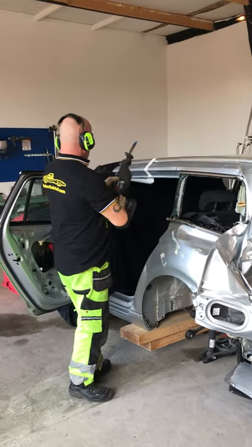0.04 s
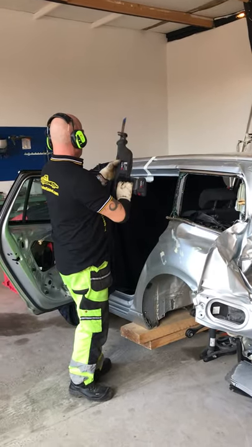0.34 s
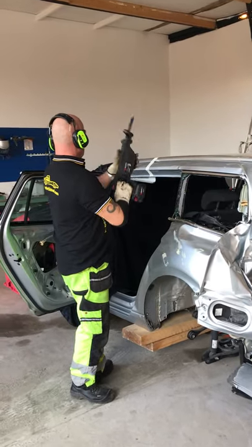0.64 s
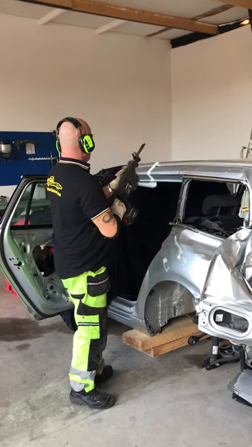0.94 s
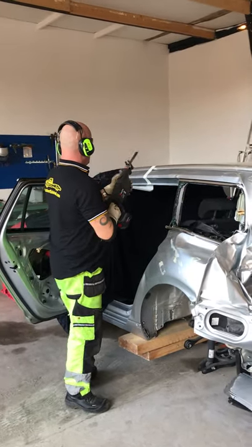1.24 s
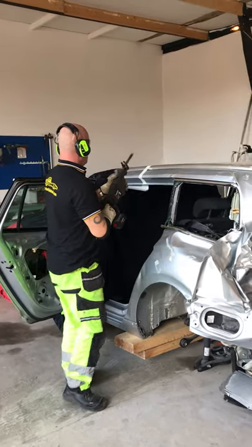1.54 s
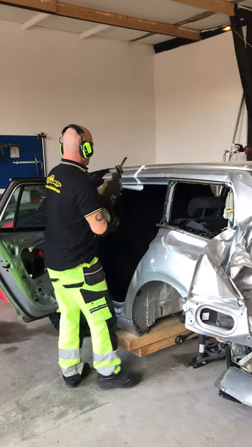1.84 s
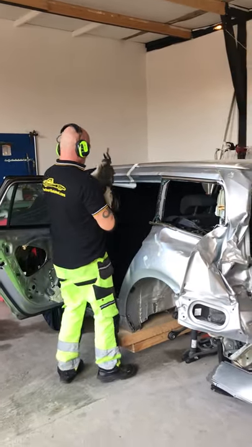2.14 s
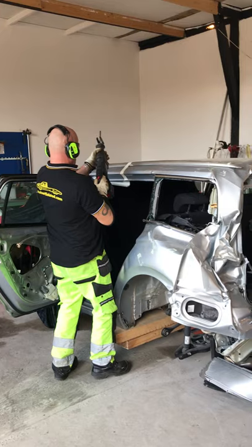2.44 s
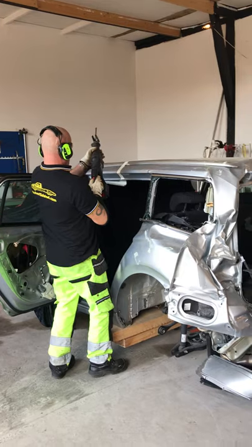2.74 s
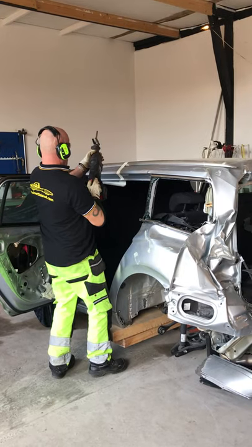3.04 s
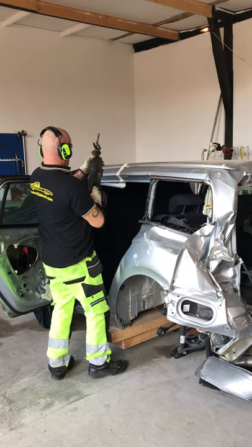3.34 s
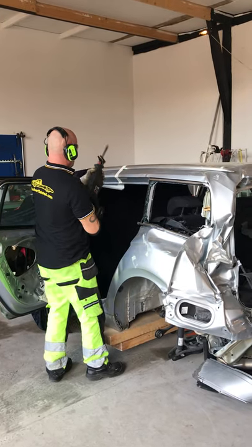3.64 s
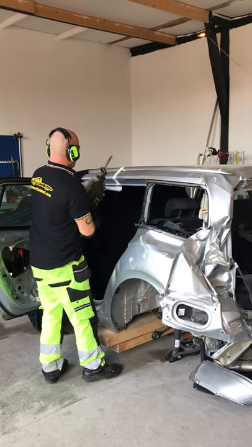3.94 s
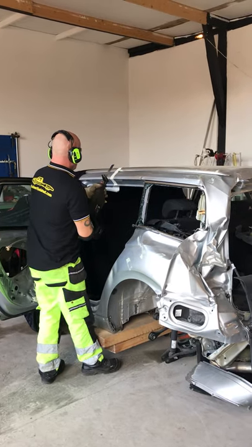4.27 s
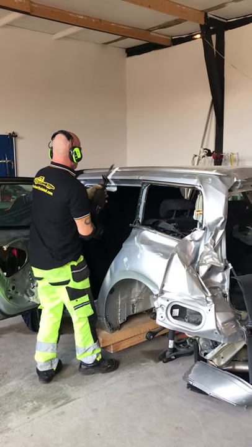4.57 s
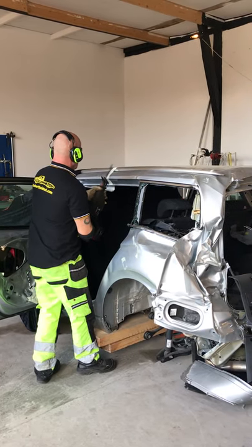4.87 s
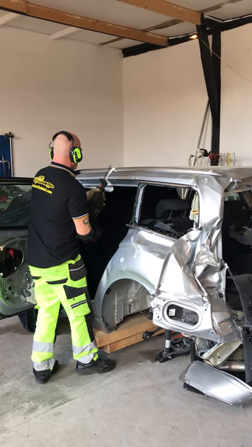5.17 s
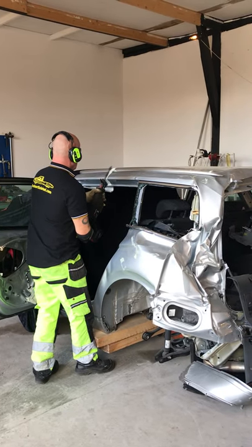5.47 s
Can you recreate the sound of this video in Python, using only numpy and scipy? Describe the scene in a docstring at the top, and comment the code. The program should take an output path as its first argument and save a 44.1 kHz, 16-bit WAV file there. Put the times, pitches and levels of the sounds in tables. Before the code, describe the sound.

A reciprocating saw gives three short bursts in an echoing workshop, then runs steadily and starts cutting a car's steel roof.

```python
"""Reciprocating saw on a car roof

A cordless saw is blipped three times in the air of a reverberant workshop, then held running.
Its crank knocks at both ends of each stroke, its gears whine and its fan hisses; at last the blade
meets a car's steel roof and hammers the shell once a stroke. A low hum, sleeves and steps lie beneath."""
import sys
import numpy as np
from scipy import signal
from scipy.fft import rfft, irfft
from scipy.io import wavfile
from scipy.ndimage import uniform_filter1d

SR = 44100
rng = np.random.default_rng(int(sys.argv[2]) if len(sys.argv) > 2 else 0)


def log_audio(samples):
    """Write samples as a 16-bit WAV file to the path given in sys.argv[1]."""
    # one column per channel
    frames = np.atleast_2d(samples).T
    # limit to full scale, then quantise
    limited = np.clip(frames, -1, 1)
    pcm = np.round(limited * 32767).astype(np.int16)
    wavfile.write(sys.argv[1], SR, pcm)


N = 251811
T = np.arange(N) / SR

# Tone curves. Each row: frequency in Hz, relative level in dB.
ROOM_TONE_EQ = [(15, -12), (25, -32), (48, 6), (69, -6.5), (118, -5.5), (343, -10), (439, -14.5),
                (1020, -15.5), (2020, -24), (3220, -24.5), (7500, -34), (10400, -37), (12600, -28.5),
                (17000, -43)]
THUD_EQ = [(20, -26), (32, 0.5), (50, 3), (75, 9), (120, -4.5), (250, -23.5), (800, -51)]  # boots and rumble
RUSH_EQ = [(200, -13), (330, 0.5), (470, -9.5), (680, 1), (1050, 2.5), (1400, -1.5), (2100, -14),
           (5000, -24)]
HISS_EQ = [(500, -45.5), (2000, 4.5), (4800, -1), (6600, 1), (7700, -5.5), (9500, 0), (10600, -6),
           (12500, 0.5), (15000, -5), (17000, -11.5)]  # fan and sleeves
CLICK_EQ = [(590, -29), (1000, -5), (2710, -10), (3350, -8.5), (5200, -3), (14600, -11), (17000, -11)]
GRIND_EQ = [(40, -15), (140, -18), (300, -5), (480, -11), (680, -20.5), (1500, -4), (3300, -2.5),
            (4900, -3.5), (6500, 0), (8000, -8.5), (17000, -7)]
KNOCK_EQ = [(40, -61), (140, -28), (300, -6.5), (430, -11), (580, -3), (1000, 0), (1600, 6.5), (3300, 1),
            (6000, -6.5), (8000, -30.5), (17000, -16.5)]
PANEL_EQ = [(50, -32), (85, -27), (125, -10), (220, -17), (315, -6), (400, -11), (600, 0.5), (800, 0),
            (1050, -0.5), (1500, 3.5), (1850, -8), (2850, -5.5), (3300, -6), (3800, -13.5), (4800, -15.5),
            (9000, -31.5), (14000, -58)]
# Fader ride of the distant rush. Each row: time in seconds, level in dB.
RUSH_RIDE = [(0, -55.5), (.9, -57), (1.7, -49.5), (2.5, -69.5), (5.7, -56)]
# Sleeves brushing the body. Each row: start and end in seconds, level in dB.
SLEEVE_MOVES = [(0.112, 0.688, -64.5), (0.704, 1.09, -61.5), (1.95, 2.462, -70.5), (3.2, 3.7, -73),
                (4.278, 4.37, -66)]
# Handling clicks. Each row: time in seconds, relative level in dB, low cut in Hz.
CLICK_CUES = [(.711, -37, 1500), (0.8828, -23, 700), (.962, -41, 4000), (2.386, -30.5, 5030),
              (2.755, -44, 2500), (3.63, -39.5, 3000)]
# Soft steps and shifts of weight. Each row: time in seconds, relative level in dB.
STEP_CUES = [(2.358, -52), (2.51, -40.5), (2.8, -50), (2.96, -49), (3.205, -52), (3.365, -51)]
# Trigger pulls. Each row: press and release in seconds, top strokes per second, spin-up time
# in seconds, starting crank position in turns, saw trim in dB, whine trim in dB.
TRIGGER_PULLS = [(1.082, 1.26, 27.57, 0.037, 0.87, 3.3, -5), (1.442, 1.785, 28.78, 0.042, 0.37, 1.8, 0),
                 (3.727, 4.03, 36.88, 0.064, 0.38, -1.2, -1), (4.575, 6, 29.46, 0.051, 0.37, 0.7, 4)]
# The saw's housing. Each row: resonance in Hz, width in Hz, relative level in dB.
HOUSING_MODES = [(694, 45, -2), (969, 124, 3.5), (1306, 127, 1), (1450, 88, 5.5), (2090, 170, 0.5),
                 (2236, 295, -4.5), (2917, 130, -0.5), (3170, 27, 5.5), (3440, 59, 5), (4240, 160, -28),
                 (5920, 120, -11)]
# Gear tones. Each row: multiple of the stroke rate, relative level in dB.
GEAR_ORDERS = [(24, -51.5), (53, -47), (68, -38), (222, -45)]
# Lone blade-holder clacks as the speed changes. Each row: time in seconds, relative level in dB.
CLACK_CUES = [(1.2314, -23), (1.3015, -28), (1.7872, -8), (3.8025, -10.5), (3.868, -11.5), (4.056, -2.5)]
# Ring of the free blade and of the car shell. Each row: frequency in Hz, relative level in dB.
BLADE_MODES = [(900, -5), (1040, -5), (1340, -4.5), (1660, 3), (2170, -5), (2280, 2), (2400, 0), (2620, -7)]
SHELL_MODES = [(118.4, -50.5), (317.6, -37), (473.7, -46), (592.2, -26), (699.8, -31), (793, -31),
               (850.6, -32), (1001, -35), (1114, -37), (1288, -37), (1319, -35), (1448, -44), (1522, -29)]
# Tails of the panels and of the hall. Each row: frequency in Hz, seconds to fall 60 dB.
PANEL_DECAY = [(150, 0.43), (700, 0.35), (1500, 0.033), (4000, 0.07), (12000, .03)]
HALL_DECAY = [(150, 0.82), (600, 1.28), (2200, 0.99), (4000, 1.03), (7000, 0.59), (10000, 0.5),
              (16000, 0.2)]


def undb(db):
    """Decibels to gain."""
    return 10 ** (np.asarray(db) / 20)


def noise(size=N):
    """White noise."""
    return rng.standard_normal(size)


def drift(rate):
    """Random modulation with a spread near 1 and `rate` new values a second."""
    knots = noise(4096)
    return 0.93 * np.interp(T * rate, np.arange(len(knots)), knots)


def swell(s, width_s):
    """A smooth rise and fall around a moment."""
    return np.exp(-((T - s) / width_s) ** 2)


def on_log(hz, rows):
    """Read (Hz, value) rows on a log-frequency axis."""
    f, value = np.transpose(rows)
    return np.interp(np.log(hz + 1), np.log(f), value)


def through(x, response):
    """Convolve with an impulse response."""
    return signal.fftconvolve(x, response)[:N]


def colour(x, rows, size=4096):
    """Minimum-phase EQ of unit energy that follows a tone curve."""
    cepstrum = irfft(np.log(undb(on_log(np.fft.rfftfreq(size, 1 / SR), rows))))
    cepstrum[1:size // 2] *= 2
    cepstrum[size // 2 + 1:] = 0
    response = irfft(np.exp(rfft(cepstrum)))
    return through(x, response / np.linalg.norm(response))


def diffuse(t60_rows, size=SR, count=14):
    """A dense tail of even colour, each band with its own decay."""
    t, hz = T[:size], np.fft.rfftfreq(size, 1 / SR)
    white = rfft(noise(size))
    centres = np.geomspace(100, 17000, count)
    tail = 0
    for centre, share in zip(centres, np.eye(count)):
        band = irfft(white * on_log(hz, np.c_[centres, share]), size)
        fade = np.exp(-np.log(1000) * t / on_log(centre, t60_rows))
        tail = tail + band * fade / np.linalg.norm(fade)
    return tail


def ringing(modes, size=SR // 2):
    """Unit-energy ring of (Hz, amplitude, decay per s) modes; neighbours swing in opposite sense."""
    t = T[:size]
    ring = sum((-1) ** k * gain * np.exp(-decay * t) * np.cos(2 * np.pi * hz * t)
               for k, (hz, gain, decay) in enumerate(modes))
    return ring / np.linalg.norm(ring)


def resonate(x, modes, t60_s):
    """Ring (Hz, dB) modes that share one decay time."""
    return through(x, ringing([(hz, undb(db), np.log(1000) / t60_s) for hz, db in modes]))


def strikes(rows, chatter, chatter_s):
    """A sharp push for each (s, dB) row, followed by a short chatter of the contact."""
    s, db = np.transpose(rows)
    pushes = np.zeros(N)
    np.add.at(pushes, np.clip(s * SR, 0, N - 1).astype(int), undb(db))
    fade = np.exp(-T[:SR // 4] / chatter_s)
    return pushes + chatter * noise() * through(pushes, fade / np.linalg.norm(fade))


def workshop(hum_hz=65):
    """The bed: quiet air, a wavering machine hum, rumble and a distant rush that comes and goes."""
    air = undb(-59 + 0.18 * drift(7.5)) * colour(noise(), ROOM_TONE_EQ)
    hum = undb(-57 + 2 * drift(16)) * np.sin(2 * np.pi * hum_hz * T + .5 * drift(25))
    rumble = undb(-68 + 2 * drift(6.05)) * colour(noise(), THUD_EQ)
    rush_db = np.interp(T, *np.transpose(RUSH_RIDE)) + drift(11)
    rush = undb(rush_db) * colour(noise(), RUSH_EQ)
    return air + hum + rumble + rush


def worker():
    """Foley: sleeves rub unevenly, the tool clicks in the hands, boots settle on concrete."""
    moving = sum(undb(db) * uniform_filter1d(1. * ((T > start) & (T < end)), SR // 20)
                 for start, end, db in SLEEVE_MOVES)
    rubbing = moving * undb(3.5 * drift(20))
    grain = noise() * undb(2.1 * drift(270) + 2 * drift(48.7))
    sleeves = rubbing * colour(grain, HISS_EQ)
    clicks = undb(4.5) * sum(click(*row) for row in CLICK_CUES)
    steps = undb(22) * colour(strikes(STEP_CUES, chatter=1, chatter_s=0.043), THUD_EQ)
    return sleeves + clicks + steps


def click(s, db, low_hz):
    """A small part snaps into place; the smaller it is, the thinner it sounds."""
    snap = colour(strikes([(s, db)], chatter=0.8, chatter_s=0.0022), CLICK_EQ)
    return signal.sosfilt(signal.butter(2, low_hz, "high", fs=SR, output="sos"), snap)


def trigger(whistle_hz=15770, growl_hz=1700):
    """While the trigger travels, the speed control whistles and the motor growls into motion."""
    def after_press(delay_s, width_s):
        return sum(swell(press + delay_s, width_s) for press, *_ in TRIGGER_PULLS)

    whistle = np.sin(2 * np.pi * whistle_hz * T + .8 * drift(150)) * after_press(.008, .03)
    growl = through(noise(), ringing([(growl_hz, 1, 1100)])) * after_press(.021, .022)
    creep = colour(noise(), GRIND_EQ) * after_press(.068, .079)
    return undb(-51) * whistle + undb(-42) * growl + undb(-47) * creep


def crank(brake_s=.075, surge_db=5.5, coast_db=-12.5, whine_fade_db_per_s=7.5):
    """The motor surges on each pull and is braked on release; speed 1 is the held run's top speed."""
    turns, rate, torque, effort_db, whine_db = np.zeros((5, N))
    for press, release, top_rate, rise_s, start_turns, trim_db, whine_trim_db in TRIGGER_PULLS:
        now = T >= press
        t = T[now]
        torque[now] = np.exp(-(np.minimum(t, release) - press) / rise_s)
        coast = np.exp(-np.maximum(t - release, 0) / brake_s)
        rate[now] = top_rate * (1 - torque[now]) * coast
        turns[now] = start_turns + np.cumsum(rate[now]) / SR
        effort_db[now] = trim_db + surge_db * torque[now] + coast_db * (1 - coast)
        whine_db[now] = whine_trim_db - whine_fade_db_per_s * (t - press)
    return turns, rate / TRIGGER_PULLS[-1][2], torque, effort_db, whine_db


def stroke_load(turns):
    """The load on the gears swells once a stroke, and a little at each reversal of the blade."""
    stroke_db = 1.95 * np.cos(2 * np.pi * (turns - 0.83))
    reversal_db = 1.6 * np.cos(4 * np.pi * (turns - 0.037))
    return undb(stroke_db + reversal_db)


def saw():
    """Knocks and gear grind ring the housing, clacks ring the blade; whine, fan and pings sit on top."""
    turns, speed, torque, effort_db, whine_db = crank()
    load = stroke_load(turns)
    housing = ringing([(hz, undb(db) * width, np.pi * width) for hz, width, db in HOUSING_MODES])
    friction = undb(1.3 * drift(600)) * load * speed ** 1.12
    clacks = strikes(np.r_[CLACK_CUES, slams(turns, speed)], chatter=1.21, chatter_s=0.0048)
    hits = undb(-23.5) * knocks(turns, speed, torque) + clacks
    shaking = undb(-9) * hits + undb(-42.5) * friction * noise()
    body = colour(hits, KNOCK_EQ) + through(shaking, housing)
    grind = undb(-42) * colour(friction * noise(), GRIND_EQ)
    blade = undb(-3.5) * resonate(clacks, BLADE_MODES, t60_s=0.07)
    top = gear_whine(turns, speed, load, whine_db) + fan(speed, load) + pings(turns, speed)
    return (body + grind + blade + top) * undb(effort_db)


def knocks(turns, speed, torque, out_db=11, back_db=1, pull_db=10, lead_s=.0003):
    """The play in the drive is taken up with a knock at both ends of the stroke."""
    half_turns = np.floor(2 * turns)
    at = np.flatnonzero((np.diff(half_turns) == 1) & (speed[1:] > .2))
    scatter_db, jitter_s = (noise((len(at), 2)) * [1.2, .0001]).T
    free_db = np.where(half_turns[at + 1] % 2, back_db, out_db)
    pull = np.sqrt(torque[at])  # under spare torque both ends knock alike
    db = free_db * (1 - pull) + pull_db * pull + scatter_db + 14 * np.log10(speed[at])
    return strikes(np.c_[T[at] - lead_s + jitter_s, db], chatter=1.18, chatter_s=0.0081)


def gear_whine(turns, speed, load, whine_db):
    """The gears sing in uneven throbs, and only near the free-running speed."""
    # the crank's speed wavers once a stroke, which smears the gear tones
    angle = turns + 0.0042 * np.sin(2 * np.pi * turns) + 0.00047 * drift(70)
    tones = sum(undb(db) * np.sin(2 * np.pi * order * angle) for order, db in GEAR_ORDERS)
    throb = load ** 1.4 * undb(whine_db + 1.7 * drift(25))
    return tones * throb * np.exp(-((speed - 1) / .13) ** 2)


def fan(speed, load):
    """The fan's rough hiss rises steeply with speed."""
    hiss = colour(noise() * undb(3.06 * drift(500)), HISS_EQ)
    return undb(-36.5) * hiss * load ** 0.29 * speed ** 3.5


def pings(turns, speed, ping_turns=0.67, ping_hz=12700):
    """Late in the stroke the thin blade pings, now faintly, now clearly."""
    at = np.flatnonzero(np.diff(np.floor(turns - ping_turns)) == 1)
    db = -31 + rng.uniform(-9, 9, len(at))
    pushes = strikes(np.c_[T[at], db], chatter=.3, chatter_s=.002)
    return resonate(pushes, [(ping_hz, 0)], t60_s=.012) * speed ** 2


def slams(turns, speed, racing_speed=1.165):
    """When the motor races, the blade holder overshoots into its stop once a stroke: (s, dB) rows."""
    at = np.flatnonzero((np.diff(np.floor(turns)) == 1) & (speed[1:] > racing_speed))
    return np.c_[T[at], -3.5 + 2.8 * noise(len(at))]


def roof_blows(contact_s=5.4443, strokes_per_s=29.67, bite_db=4.5, bite_s=0.049):
    """The blade hammers the roof once a stroke, hardest as it first bites: (s, dB) rows."""
    since = np.arange(0, T[-1] - contact_s, 1 / strokes_per_s)
    scatter_db, jitter_s = (noise((len(since), 2)) * [.1, .0004]).T
    db = -9 + bite_db * np.exp(-(since / bite_s) ** 2) + scatter_db
    return np.c_[contact_s + since + jitter_s, db]


def roof():
    """Each blow cracks, runs through the sheet as a chirp, scatters in the panels and rings the shell."""
    blows = [strikes([row], chatter=0.39, chatter_s=0.006) for row in roof_blows()]
    hammering = sum(blows)
    crack = colour(hammering, PANEL_EQ)
    chirp = bending(crack)
    # the blade skips, so each blow lands on another spot and scatters in its own way
    scattered = sum(through(blow, diffuse(PANEL_DECAY, size=SR // 3)) for blow in blows)
    panels = colour(scattered, PANEL_EQ)
    shell = resonate(hammering, SHELL_MODES, t60_s=1)
    return undb(1) * crack + undb(11.5) * chirp + undb(13) * panels + undb(9.5) * shell


def bending(x, lag_s=.021, corner_hz=570):
    """Bending waves in thin steel: the lows travel slower, so a click becomes a falling chirp."""
    hz = np.fft.rfftfreq(SR // 8, 1 / SR)
    delay = lag_s / (1 + (hz / corner_hz) ** 2)
    return through(x, irfft(np.exp(-2j * np.pi * np.cumsum(delay) * hz[1])))


def scene():
    """The mix: floor and car side answer the tool at once; the bare hall rings on for a second."""
    tool = trigger() + saw() + roof()
    foley = worker()
    early = through(tool, diffuse([(200, 0.05), (3000, 0.24), (14000, 0.06)]))
    hall = diffuse(HALL_DECAY) * (1 - np.exp(-T[:SR] / 0.011))
    # the air and the walls swallow the treble
    send = colour(tool + .5 * foley,
                  [(100, 4.5), (1000, -2.5), (2500, -0.5), (5000, -6), (9000, -4), (17000, -12)])
    return (tool + foley + undb(-9.5) * early + undb(-7) * through(send, hall) + workshop())[None]


def record(dry, top_hz=17250):
    """A steep high cut takes off the very top."""
    return signal.sosfilt(signal.ellip(10, .1, 70, top_hz, fs=SR, output="sos"), dry)


dry = scene()
out = record(dry)
log_audio(out)
```